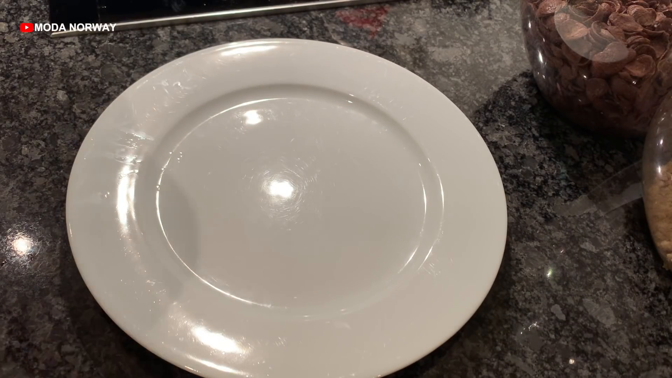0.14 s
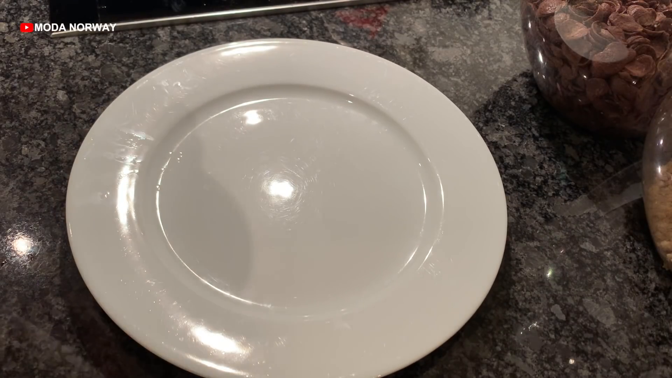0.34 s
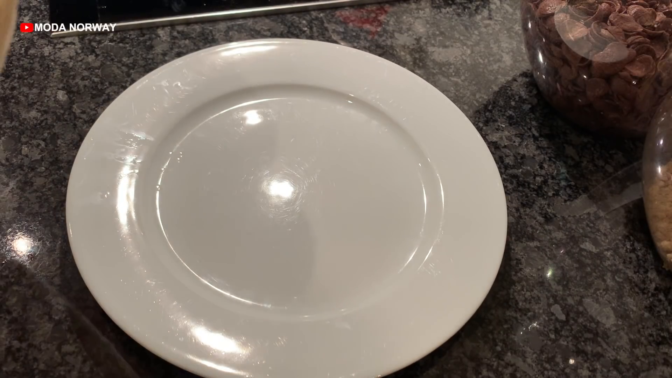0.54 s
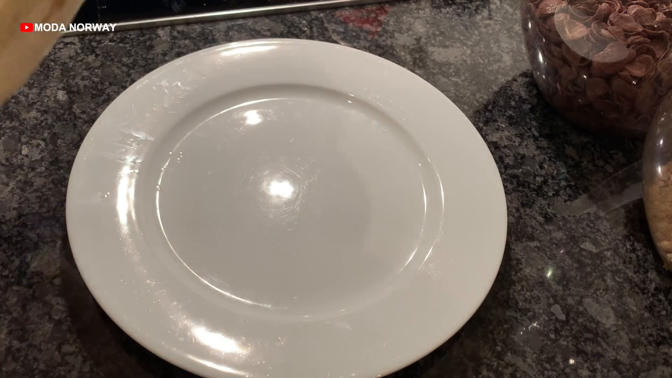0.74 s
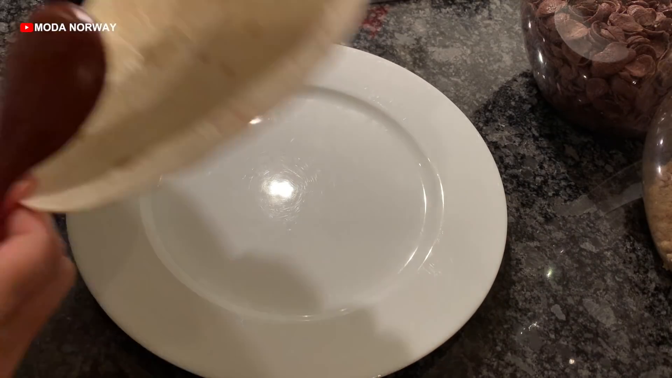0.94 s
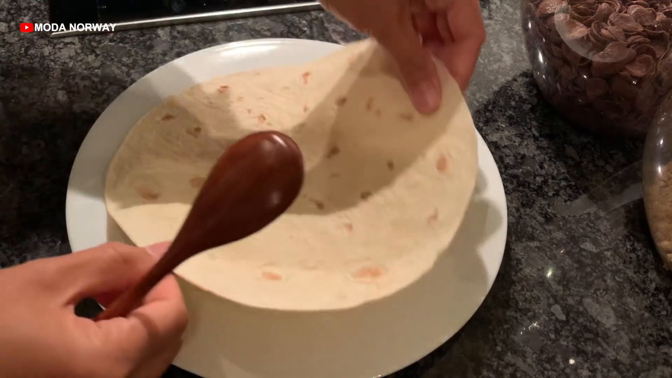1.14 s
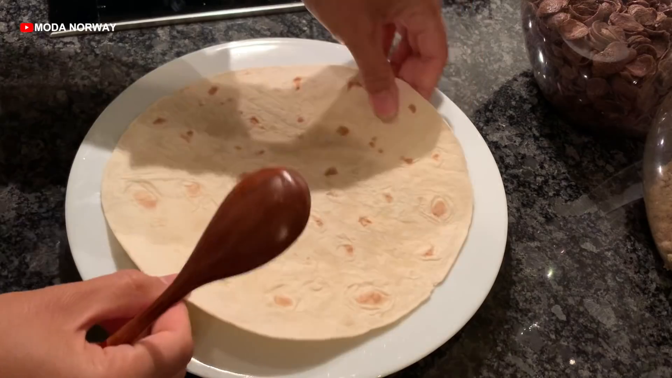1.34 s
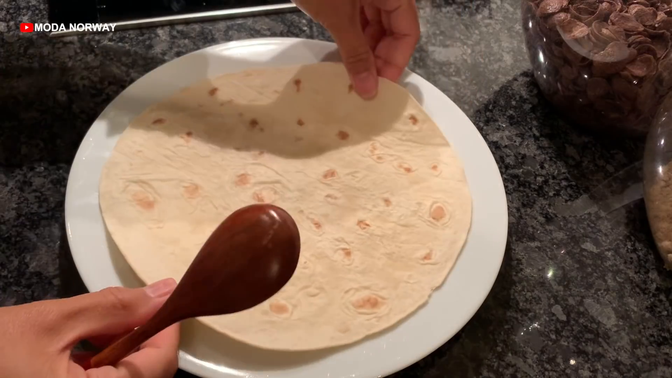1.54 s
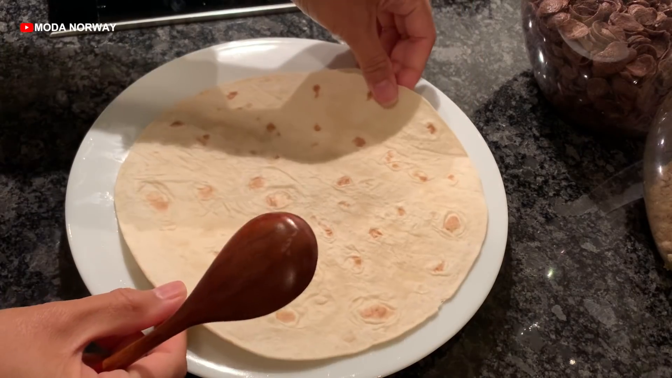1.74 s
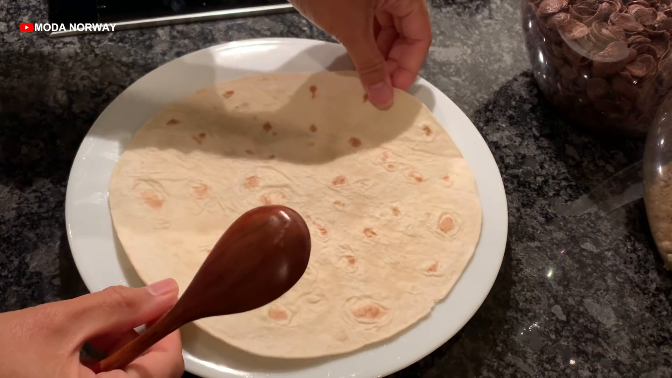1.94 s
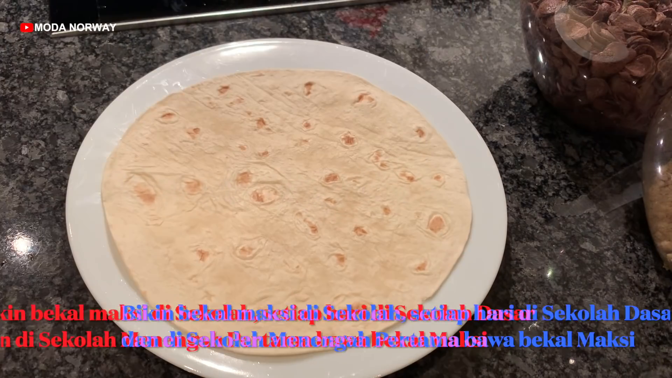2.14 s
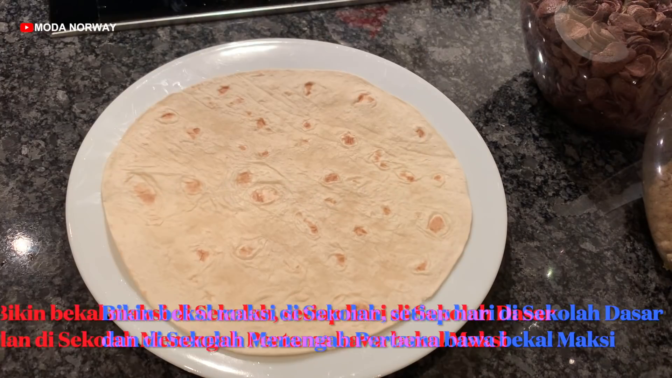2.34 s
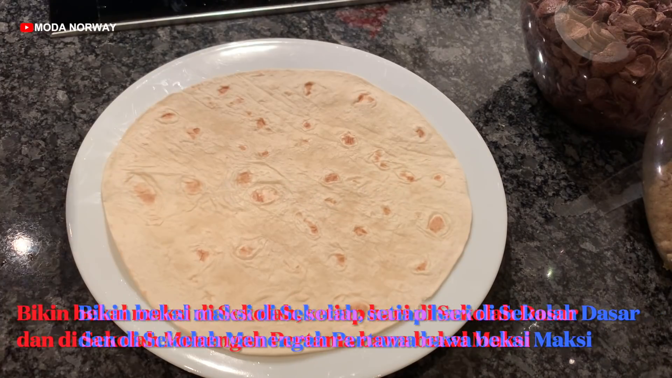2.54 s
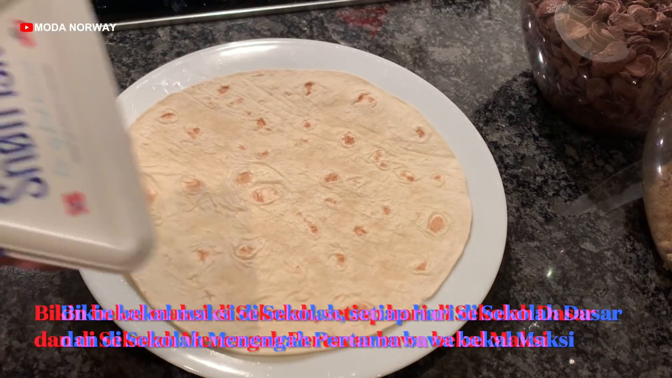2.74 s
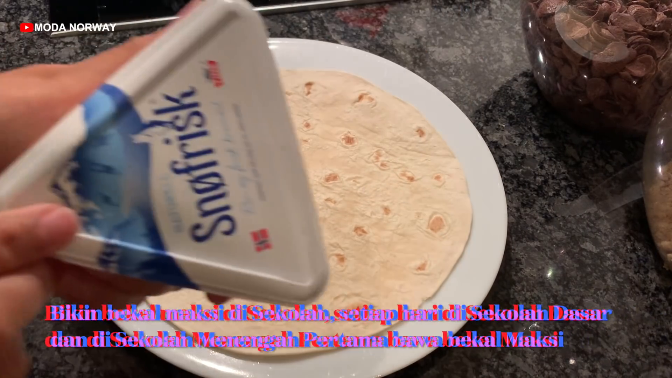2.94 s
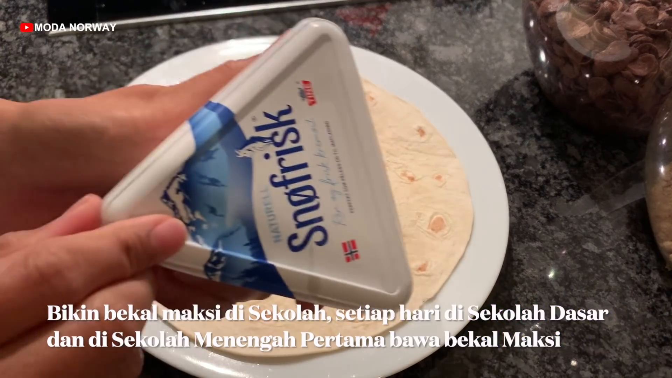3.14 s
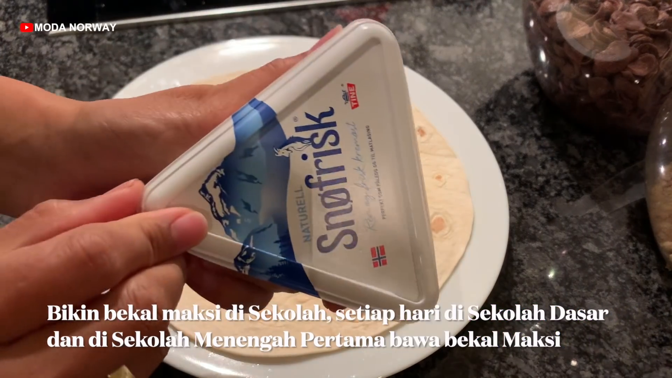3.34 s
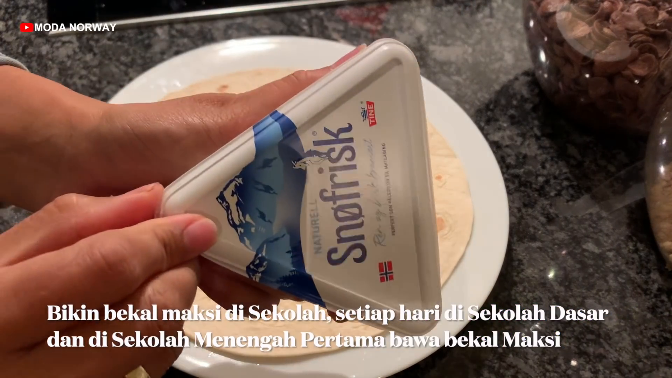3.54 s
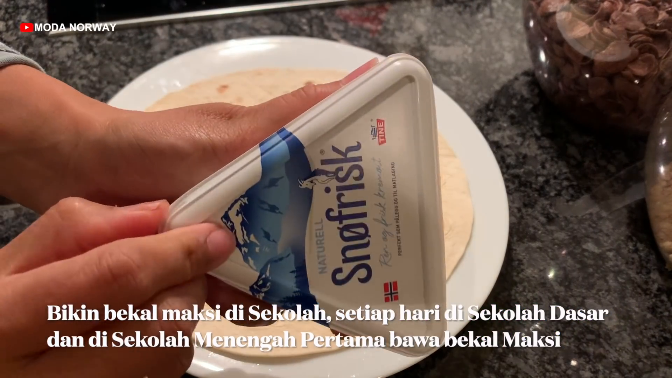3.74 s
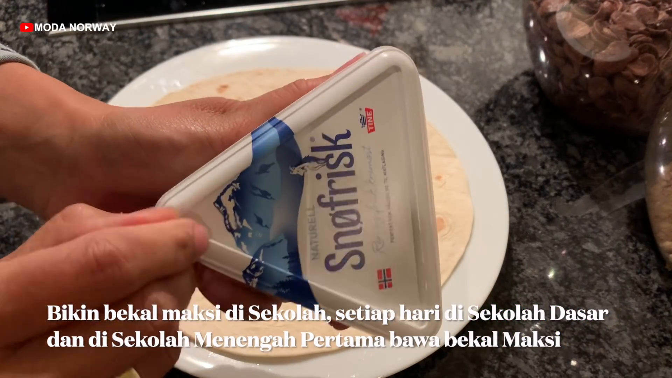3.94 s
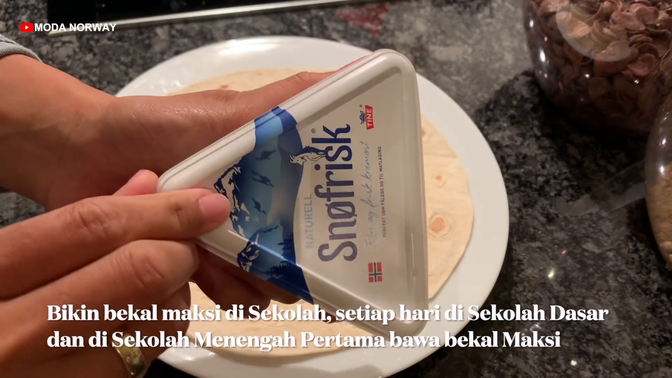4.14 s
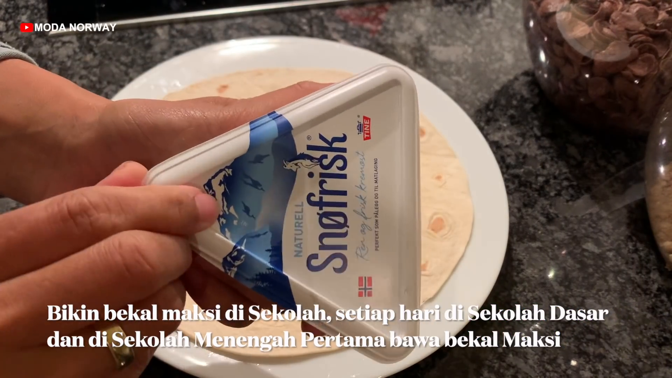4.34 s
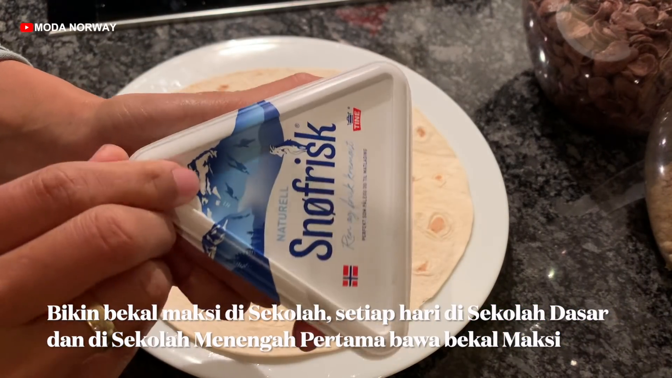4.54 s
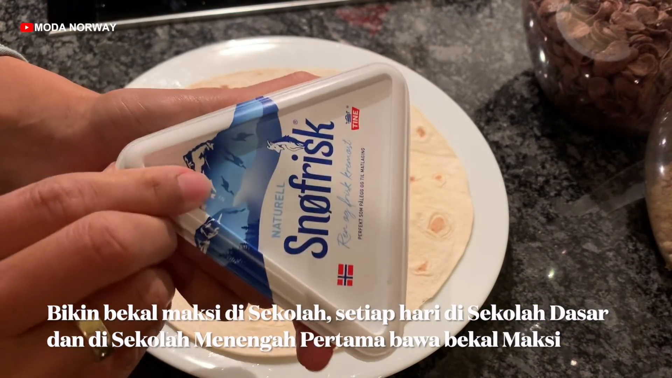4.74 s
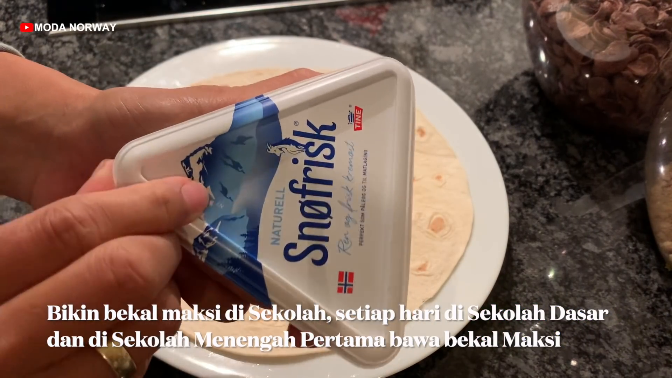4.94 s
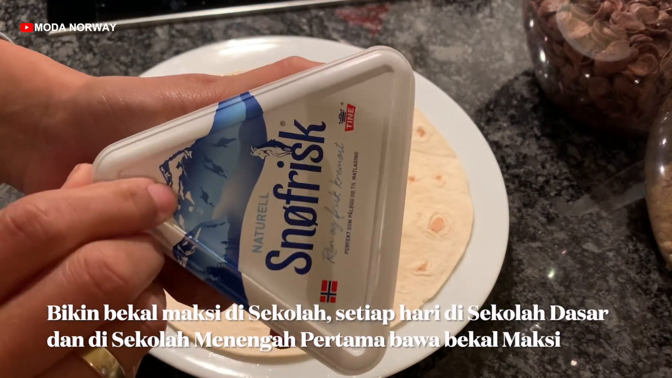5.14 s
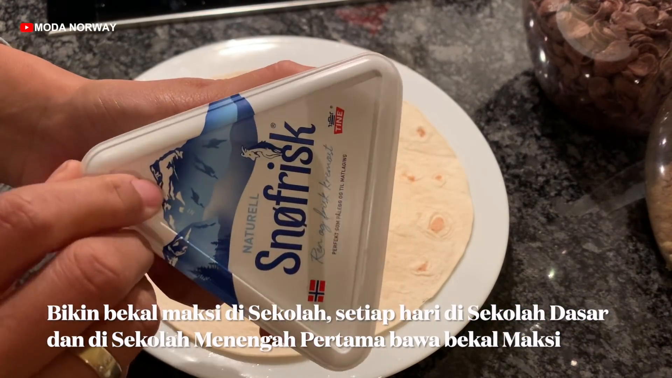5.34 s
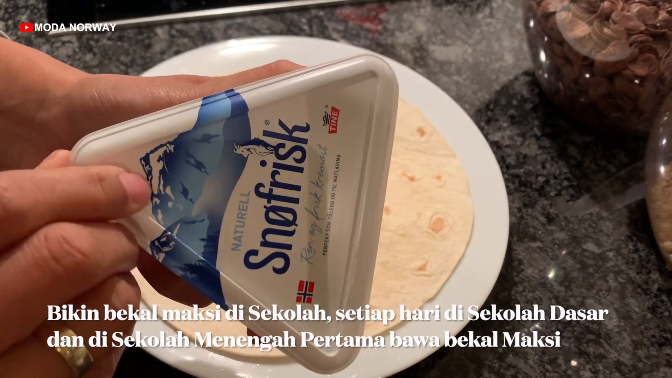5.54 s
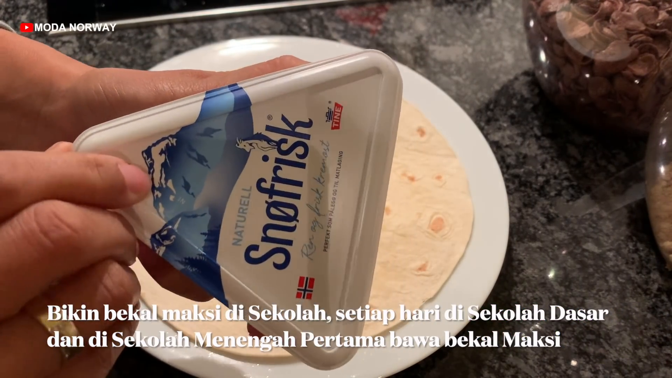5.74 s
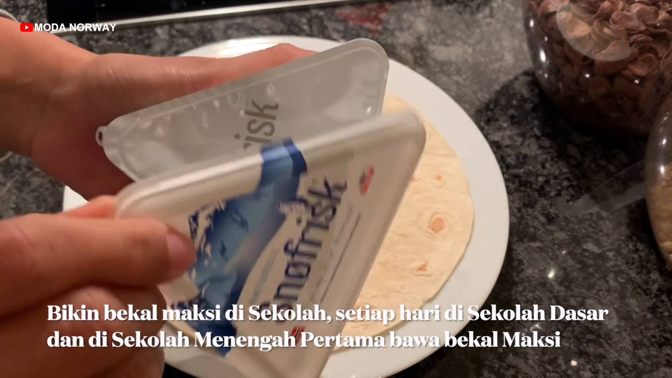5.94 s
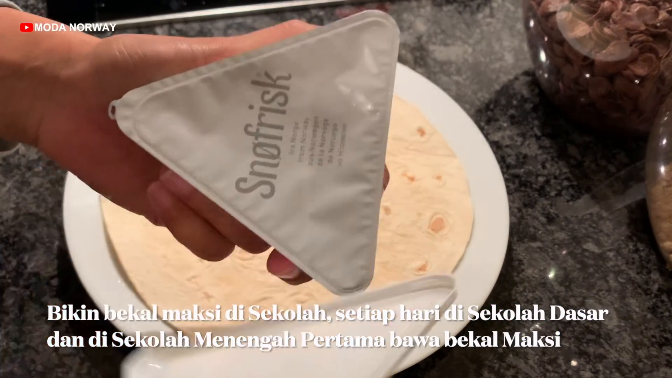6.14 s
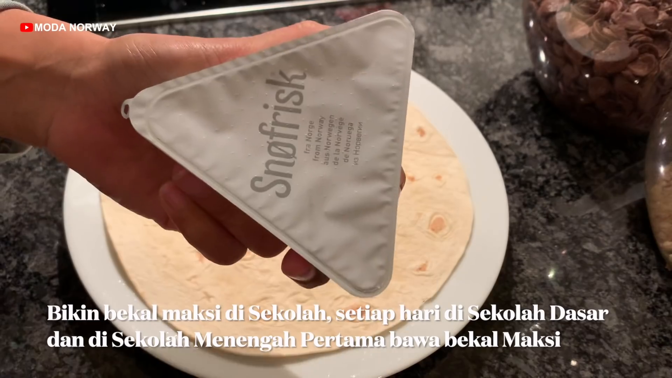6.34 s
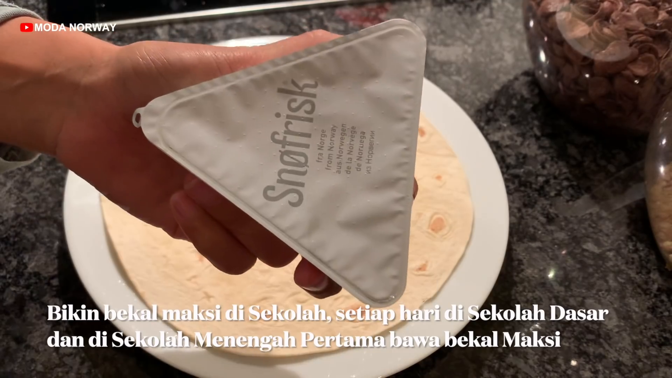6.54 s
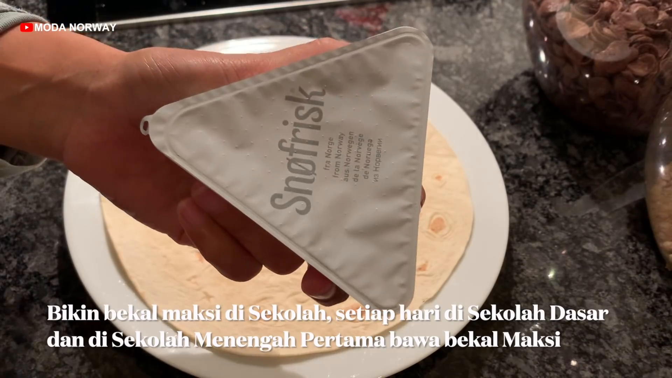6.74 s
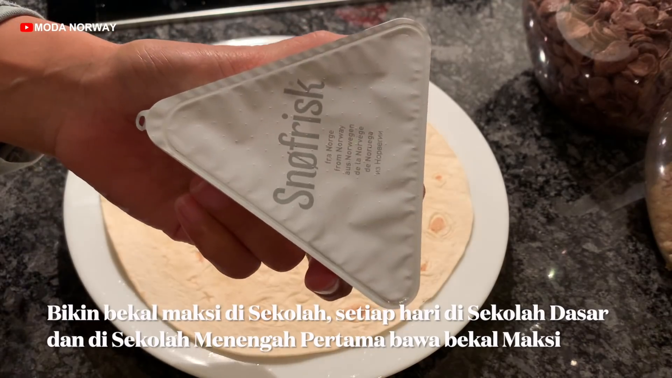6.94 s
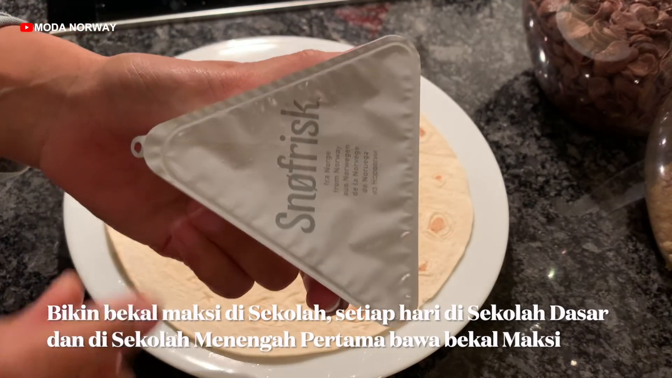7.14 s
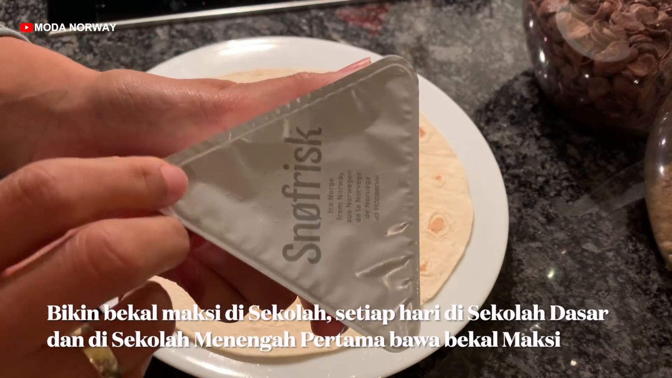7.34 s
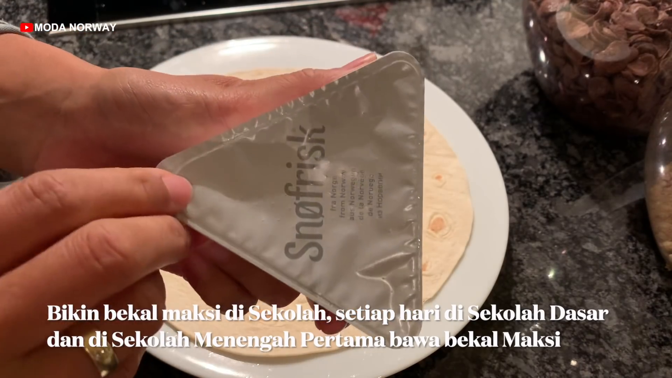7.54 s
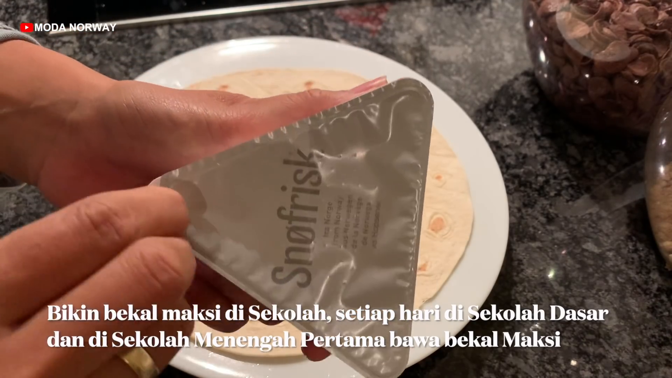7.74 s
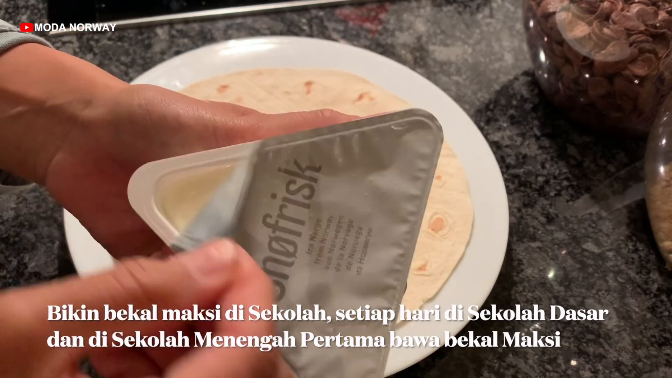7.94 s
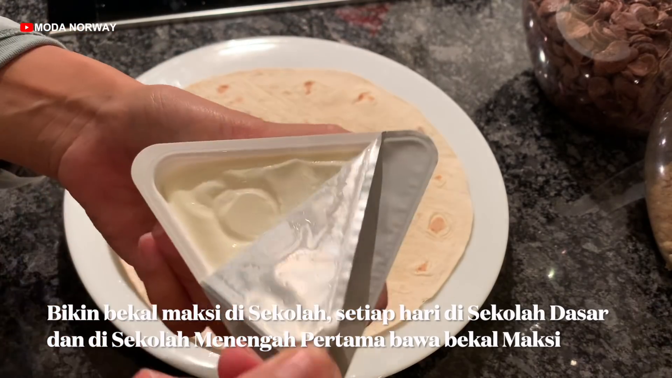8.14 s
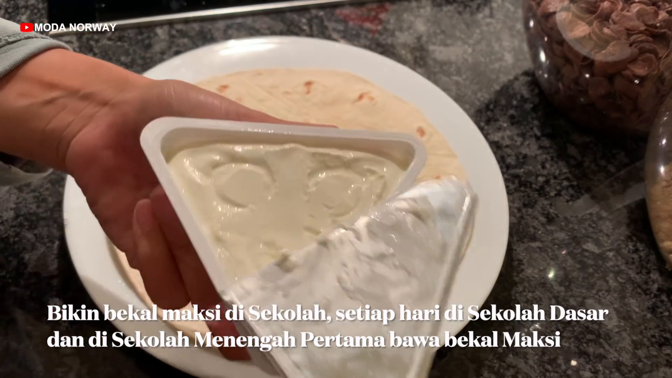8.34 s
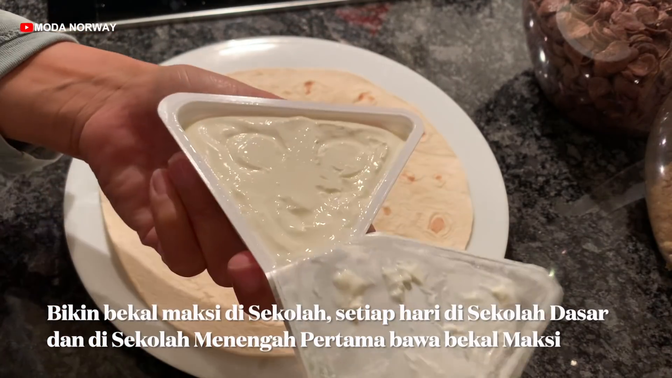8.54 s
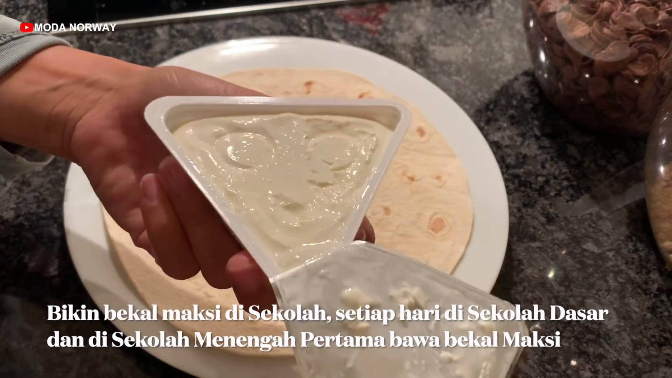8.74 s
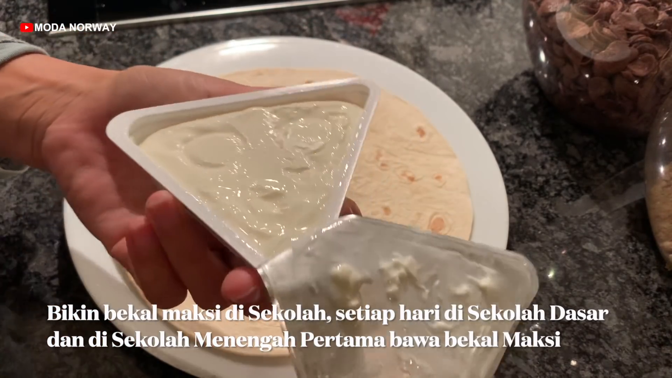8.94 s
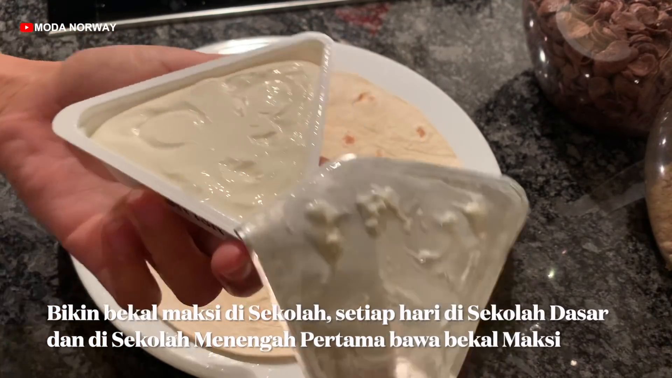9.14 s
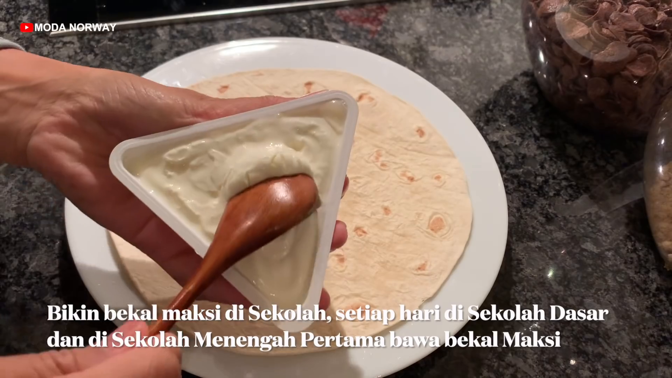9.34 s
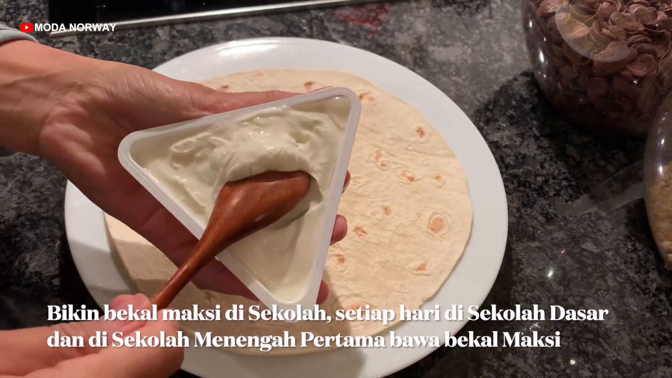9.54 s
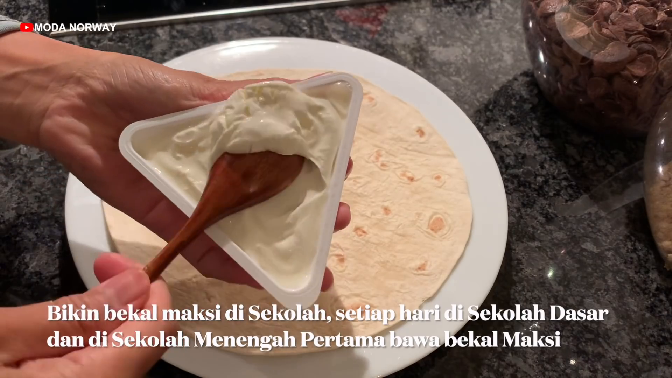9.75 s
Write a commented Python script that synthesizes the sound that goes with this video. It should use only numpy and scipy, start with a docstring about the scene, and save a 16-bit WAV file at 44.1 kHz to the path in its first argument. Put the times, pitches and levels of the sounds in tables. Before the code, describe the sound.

A plastic tub is knocked, flexed and cracked open, its foil seal ripped off in two crackly pulls, before a spoon softly digs in.

```python
"""Snapping plastic close up at a stone kitchen counter, with hollow wooden knocks a little further off; a plate
is lightly tapped. A tub's lid is prised off in runs of cracks; its foil seal crackles away in two pulls and a
spoon digs in soft cheese. Struck parts ring as modes and short noise, coloured by place; friction is filtered
noise made of tiny slips. Hands rub and bump in spells; a small hard room answers with a short tail over a faint
hush."""
import sys
import numpy as np
from scipy import signal
from scipy.fft import rfft, irfft, next_fast_len
from scipy.io import wavfile
from scipy.ndimage import uniform_filter1d

SR = 44100
rng = np.random.default_rng(int(sys.argv[2]) if len(sys.argv) > 2 else 0)


def store_pcm(level_fs):
    """Save levels as 16-bit WAV."""
    pcm = np.round(np.clip(level_fs, -1, 1) * 32767).astype(np.int16)
    wavfile.write(sys.argv[1], SR, np.atleast_2d(pcm).T)


N = 431298
TIME = np.arange(N) / SR
NEAR_SPREAD = .5  # how far near sounds differ between the two microphones


# knocks and scuffs of woodwork: start_s, contact_s, level_db, hardness_db, place
KNOCKS = [(0.324, 0.021, -54.5, 6.5, "frame"), (0.592, 0.12, -33.5, 14, "side"),
          (0.647, 0.012, -12, -9, "panel"), (.765, 0.056, -33.5, -39, "panel"),
          (0.806, 0.02, -43.5, -8, "panel"), (1.024, 0.0045, -32, -30, "panel"),
          (1.064, 0.004, -33, -80, "panel"), (1.118, 0.0055, -37, -30, "side"),
          (1.209, 0.018, -40, -1, "edge"), (1.225, 0.011, -23.5, -22.5, "panel"),
          (1.578, 0.027, -40.5, 7.5, "edge"), (1.604, 0.012, -30, -26, "edge"),
          (1.891, 0.0032, -52, -21.5, "side"), (3.404, 0.026, -23.5, -4, "edge"),
          (3.537, 0.0097, -25.5, -7, "panel"), (3.575, 0.029, -18.5, -8, "panel"),
          (3.645, 0.021, -10, -9.5, "panel"), (3.738, 0.02, -26, 4, "side"),
          (3.779, 0.006, -18, 11, "side"), (4.063, 0.0042, -22.5, -2, "edge"),
          (4.295, 0.015, -36.5, -1.5, "edge"), (4.453, 0.012, -31.5, -6.5, "edge"),
          (4.483, 0.035, -27.5, 11.5, "side"), (4.606, 0.019, -35, 5.5, "frame"),
          (4.638, 0.015, -26.5, 8, "side"), (4.745, 0.017, -20.5, -9.5, "panel"),
          (4.786, 0.03, -17, 9, "edge"), (4.808, 0.0076, -12.5, -22, "edge"),
          (4.997, 0.016, -33, -0.5, "panel"), (5.087, 0.0085, -28.5, -10.5, "panel"),
          (5.183, 0.02, -27, 1, "side"), (5.52, 0.02, -33.5, 6, "side"), (7.34, 0.03, -25.5, 0, "side"),
          (7.678, 0.0069, -37.5, 18, "side")]
# clear modes of the woodwork: mode_hz, level_db, base_t60_s
WOOD_MODES = [(137.6, -11.5, 0.23), (180.4, -10.5, 0.11), (346, -14.5, 0.049), (441, -17, 0.027),
              (598, -16.5, 0.06), (766, -18, 0.15), (820.6, -16, 0.11), (973, -27.5, 0.1),
              (1069, -18.5, 0.039), (1468, -22.5, 0.078), (1596, -22.5, 0.06), (1783, -19, 0.04),
              (2307, -17, 0.071), (2700, -24, 0.06), (2905, -24, .08), (3430, -22.5, 0.11),
              (3890, -33.5, .08)]
# answer of each place, relative to its body register: tone_hz, boom_db, clack_db, fizz_db
PLACES = {"frame": (345.5, 20, -6, -11), "side": (441, 1, -10.5, -25), "panel": (804, -12.5, -2, -6.5),
          "edge": (1099, -2, 1.5, -10)}
CLACK_SHARE, HARDNESS_DB_PER_OCTAVE = .4, 23.5  # share of hardness in the clack; extension of the treble
SUSTAIN, SUSTAIN_WIDTH_OCTAVES = .6, .088  # modes near the favoured tone ring longer


def knocks(dense_t60_s=0.06, dense_hz=1900, dense_db=-13, release_s=0.0042, favour=1.4, sharpness=7.5, top_hz=14000):
    """A rough contact drives clear wood modes over many short ones; hardness lifts fizz and treble limit."""
    t = np.arange(SR // 3) / SR
    out = np.zeros((2, N))
    for start_s, contact_s, level_db, hardness_db, place in KNOCKS:
        tone_hz, boom_db, clack_db, fizz_db = PLACES[place]
        modes = []
        for hz, mode_db, t60_s in WOOD_MODES:
            octaves_off = np.log2(hz / tone_hz)
            longer = 1 + SUSTAIN * np.exp(-(octaves_off / SUSTAIN_WIDTH_OCTAVES) ** 2)
            modes.append((hz, mode_db, t60_s * longer))
        clack_db += CLACK_SHARE * hardness_db
        levels_db = level_db + np.array([boom_db, 0, clack_db, fizz_db + hardness_db])

        push = np.exp(-np.maximum(t - contact_s, 0) / release_s)  # held, then let go
        roughness = rng.standard_normal(len(t)) * amp(2.1 * rng.standard_normal(len(t)))
        force = push * roughness
        dense = signal.lfilter(*signal.butter(1, dense_hz, fs=SR), rattle(force, dense_t60_s, 1.0))
        blow = shaken(force, modes, NEAR_SPREAD) + amp(dense_db) * unit(dense)
        blow = favoured(blow, tone_hz, favour, sharpness)
        blow = signal.sosfilt(signal.butter(6, 128, "high", fs=SR, output="sos"), blow)  # below the modes
        blow = soften(blow, top_hz * 2 ** (hardness_db / HARDNESS_DB_PER_OCTAVE))
        add(out, start_s, voiced(blow, levels_db, contact_s + 0.15))
    return out


# snaps of the plastic: start_s, buckle_s, level_db, tone_hz, part
SNAPS = [(.108, 0.0032, -42, 3000, "lip"), (2.32, 0.0017, -52.5, 2300, "rim"),
         (2.435, 0.0022, -44.5, 2330, "rim"), (2.65, 0.00094, -17, 2430, "lid"),
         (2.6527, 0.0021, -18, 2870, "rim"), (2.85, 0.004, -42, 2500, "rim"),
         (2.979, 0.0011, -60, 2170, "lid"), (3.811, 0.0052, -15.5, 1890, "wall"),
         (3.852, 0.0014, -32.5, 1700, "thin corner"), (4.767, 0.0018, -31, 2400, "wall"),
         (4.958, 0.0017, -37, 1780, "wall"), (5.33, 0.0053, -30, 3100, "lid"),
         (5.34, 0.0027, -26, 2980, "lip"), (5.35, 0.0044, -30, 3000, "rim"),
         (5.371, 0.0017, -22, 3260, "rim"), (5.806, 0.0083, -11.5, 3700, "whole tub"),
         (6.151, .0011, -34.5, 2300, "rim"), (6.182, 0.00098, -41, 2300, "thin corner"),
         (6.4, 0.0061, -18.5, 2480, "lid"), (6.823, 0.007, -6.5, 2070, "lid"),
         (6.8697, .00055, -20, 3270, "lid"), (6.9057, 0.0012, -14.5, 1680, "rim"),
         (7.421, .00085, -37, 3450, "thin corner"), (7.691, 0.0022, -30, 3550, "rim"),
         (7.735, 0.0006, -39.5, 3440, "thin corner"), (7.776, 0.0017, -36.5, 3000, "lid"),
         (8.427, 0.0026, -21.5, 2160, "wall"), (8.514, 0.01, -26, 1960, "lid"),
         (8.633, 0.0009, -20, 3240, "wall"), (8.722, 0.0016, -32, 2210, "filled base"),
         (8.951, 0.0013, -34, 3500, "thin corner"), (9.058, 0.0023, -46, 3770, "lid"),
         (9.13, 0.0055, -32, 1850, "filled base"), (9.175, 0.002, -38, 3900, "lid")]
# modes of the tub: mode_hz, level_db, t60_s
TUB_MODES = [(180, 3, .08), (580, -1, .05), (820, 0, .035), (1400, -3, .03), (1800, 0, .04),
             (2180, 0, .035), (2850, 0, .045), (3450, 1, .035), (6600, 2, .025)]
# answer of each part, relative to its clack register: boom_db, body_db, fizz_db, top_hz
PARTS = {"lid": (-22, -23, -9.5, 12008), "rim": (-21.5, -17, -2.5, 13996.5), "wall": (-16.5, -6, 1, 15012),
         "whole tub": (0.5, -4, -2, 9008), "lip": (-21, -7, 2, 16002), "thin corner": (-27, -4, 7, 16010),
         "filled base": (-9, -1.5, -13, 6006)}
TUB_GAP_HZ = 1214  # weak answer between low and high modes
SETTLE_T60_S, FLUTTER_T60_S = .06, .28


def snaps(crack_db=19, crack_t60_s=0.013, settle_db=-6, flutter_db=-27, favour=1.2):
    """Thin plastic buckles in a run of cracks; the shell rings, settles in creaks and leaves a faint noise tail."""
    t = np.arange(SR // 3) / SR
    out = np.zeros((2, N))
    for start_s, buckle_s, level_db, tone_hz, part in SNAPS:
        boom_db, body_db, fizz_db, top_hz = PARTS[part]
        levels_db = level_db + np.array([boom_db, body_db, 0, fizz_db])

        cracks = (rng.random(len(t)) < 3500 / SR) * (t < buckle_s) * rng.standard_normal(len(t))
        cracks[0] = 1
        cracks /= np.linalg.norm(cracks)
        shell = ring(TUB_MODES, t, 0.8, uneven_db=1, detune=0.025)
        snap = shell + amp(crack_db) * rattle(cracks, crack_t60_s, NEAR_SPREAD)

        jolts = (rng.random(len(t)) < 300 / SR) * rng.standard_normal(len(t))
        creaks = unit(rattle(jolts, .02, 1.0)) * amp(settle_db - 60 * t / SETTLE_T60_S)
        flutter = pair(len(t), 0.67) * amp(flutter_db - 60 * t / FLUTTER_T60_S)
        snap = snap + (creaks + flutter) * np.std(snap[:, :SR // 100])

        snap = favoured(snap, tone_hz, favour, 2.3)
        snap = favoured(snap, TUB_GAP_HZ, -.3, 2)
        add(out, start_s, voiced(soften(snap, top_hz), levels_db, buckle_s + 0.036))
    return out


# tugs that peel the seal, the last only bending it back: start_s, end_s, level_db
TUGS = [(7.87, 7.97, -21), (7.956, 8.033, -13), (8.186, 8.271, -17), (8.308, 8.372, -19),
        (8.456, 8.503, -30.5)]
# sudden slips of the seal: start_s, level_db (before rip_db), tone_hz
RIPS = [(7.8095, -19.5, 7170), (7.837, -14.5, 3000), (7.842, -20.5, 3000), (7.874, -18.5, 4000),
        (7.935, -16, 5630), (7.942, -8.5, 4200), (7.9645, -11.5, 4600), (7.967, -8.5, 1475),
        (7.9745, -23, 6500), (7.98, -14.5, 5300), (7.9865, -11.5, 6400), (7.989, -15, 4300),
        (8.022, -13.5, 7700), (8.033, -24, 3000), (8.048, -15.5, 3140), (8.075, -24.5, 2800),
        (8.218, -15, 5640), (8.228, -10, 4800), (8.258, -22, 6060), (8.261, -14.5, 6600),
        (8.279, -19, 4430), (8.33, -20, 1800), (8.351, -21, 4300), (8.358, -17, 1800), (8.387, -24.5, 1900)]
# spectrum of the tearing foil: freq_hz, level_db_per_hz
FOIL_COLOUR = [(150, -15.5), (600, -46), (1350, -20), (2300, -5.5), (4000, -3), (7000, -0.5), (10000, 0.5),
               (13500, 1.5), (16000, -4)]
TUG_ATTACK_S, TUG_RELEASE_S = 0.021, 0.027


def foil(peel_db=-2, rip_db=1, favour=0.65, sharpness=3):
    """The seal lets go in crackles and sharp slips while creases pop; the freed sheet adds a deeper voice."""
    pull = sum(amp(db) * gesture(start_s, end_s, TUG_ATTACK_S, TUG_RELEASE_S) for start_s, end_s, db in TUGS)
    tear = amp(peel_db) * pull * grains(340, 4.8, .0006, .07)
    t = np.arange(SR // 50) / SR
    slip_shape = t * np.exp(-t / .0008)
    for start_s, level_db, tone_hz in RIPS:
        slip = favoured(pair(len(t), NEAR_SPREAD) * slip_shape, tone_hz, favour, sharpness)
        add(tear, start_s, amp(level_db + rip_db) * unit(slip))

    freed = np.interp(TIME, [8.25, 8.37], [0, 1])
    creases = pull * crinkles(450, 950, 4500, 3) * amp(-16 + 8 * freed)
    sheet_colour = [(120, -2.5), (600, 11.5), (1200, -14), (1800, 10), (2600, 1), (4200, 10.5), (6000, -8.0)]
    sheet = colour(tear * freed, sheet_colour)
    return crumple(colour(tear, FOIL_COLOUR) + sheet, depth_db=4.2) + creases


# light taps on the plate: start_s, level_db (halved in amplitude below)
TAPS = [(1.012, -29.5), (1.211, -40)]
# modes of the plate: mode_hz, level_db, t60_s
PLATE_MODES = [(1400, -3, .17), (2153, -5, 0.22), (2955, -4, 0.12), (3740, -2, 0.06), (4657, -4, 0.09),
               (5590, -4, 0.16), (6600, -4, .13), (7741, -6, .16), (8958, -6, 0.14)]


def plate(tick_db=4, tick_t60_s=0.022):
    """China answers a light touch with a noise tick and a short modal ring."""
    t = np.arange(SR // 3) / SR
    out = np.zeros((2, N))
    for start_s, level_db in TAPS:
        tick = amp(tick_db - 60 * t / tick_t60_s) * pair(len(t), 0.98)
        china = ring(PLATE_MODES, t, NEAR_SPREAD, uneven_db=2, detune=0)
        add(out, start_s, amp(level_db) * (china + tick) / 2)
    return out


# sliding strokes of hand, lid and spoon: peak_s, swell_s, level_db, surface
STROKES = [(.07, .035, -57.5, "tortilla"), (1.47, 0.16, -42, "tortilla"), (1.951, 0.025, -34, "skin"),
           (2.39, 0.1, -55.5, "tub wall"), (2.449, 0.077, -45.5, "tortilla"), (3.168, 0.12, -59, "soft"),
           (6.061, 0.037, -27.5, "plastic"), (6.13, 0.0086, -37.5, "plastic"),
           (6.752, 0.02, -43, "plastic"), (7.123, 0.041, -39.5, "foil"), (7.533, 0.022, -37, "tub wall"),
           (8.865, 0.0063, -31.5, "foil"), (9.475, 0.055, -42, "plastic"), (9.528, 0.0048, -39, "plastic")]
# friction on each surface: centre_hz, hiss_db
SURFACES = {"tortilla": (3370, 0), "tub wall": (2330, -29), "foil": (2020, -20.5), "skin": (2870, -38),
            "plastic": (2580, -50), "soft": (720, -45)}


def strokes(fade_s=0.042):
    """Friction grains in a broad band swell and die away; each surface has its own pitch, the soft one lowest."""
    friction = grains(740, 9.3, 0.0078, 1.0)
    out = np.zeros((2, N))
    hiss = unit(colour(friction, [(5000, -29.5), (9000, -34.5), (13500, 17.0), (16000, 10.5)]))
    band_colour = [(150, -1.5), (500, 12.0), (5000, -18.0), (10000, -10.5), (16000, -27.5)]
    for peak_s, swell_s, level_db, surface in STROKES:
        centre_hz, hiss_db = SURFACES[surface]
        first = round((peak_s - 2 * swell_s) * SR)
        t = TIME[first:][:SR * 3 // 4] - peak_s
        span = slice(first, first + len(t))
        edges_hz = [centre_hz / 0.69, min(centre_hz * 2.43, SR * .45)]
        band = signal.lfilter(*signal.butter(1, edges_hz, "band", fs=SR), friction[:, span])
        band = colour(favoured(band, centre_hz, 1.5, 2.5), band_colour)
        rub = unit(band) + amp(hiss_db) * hiss[:, span]
        shape = np.where(t < 0, np.exp(-(t / swell_s) ** 2 * 2), np.exp(-abs(t) / fade_s))
        add(out, first / SR, amp(level_db) * unit(rub) * shape)
    return crumple(out, depth_db=5.5)


# scoops of the spoon: start_s, end_s, level_db, start_tone_hz, end_tone_hz
SCOOPS = [(9.22, 9.245, -39, 1190, 1200), (9.27, 9.31, -43.5, 597, 1250), (9.34, 9.36, -42, 1170, 1514),
          (9.405, 9.485, -36.5, 594, 1380), (9.645, 9.665, -41, 1170, 1360)]
# spectrum of the tub of cheese: freq_hz, level_db_per_hz
HOLLOW = [(150, 2), (460, -9.5), (630, -6), (850, -10), (1380, -7.5), (1750, -9), (2190, -2.5), (2800, -6),
          (3900, -4.5), (8000, -31), (16000, -57)]
SCOOP_ATTACK_S, SCOOP_RELEASE_S = .01, .025


def scoops(smear_db=-5, pops_db=-5, width_hz=320):
    """A spoon drags through sticky cheese: tone rising as the bowl fills, and wet pops, coloured by the tub."""
    drag = grains(300, 5, .002, .4)
    pops = crinkles(300, 400, 2600, 4)
    tone_s = np.ravel([row[:2] for row in SCOOPS])
    tone_hz = np.interp(TIME, tone_s, np.ravel([row[3:] for row in SCOOPS]))
    # moving resonance: shift the tone to 0 Hz, low-pass, shift back
    turn = np.exp(2j * np.pi * np.cumsum(tone_hz) / SR)
    r = np.exp(-np.pi * width_hz / SR)
    squelch = unit((turn * signal.lfilter([1 - r], [1, -r], drag / turn)).real)
    push = sum(amp(db) * gesture(start_s, end_s, SCOOP_ATTACK_S, SCOOP_RELEASE_S)
               for start_s, end_s, db, _, _ in SCOOPS)
    wet = unit(colour(squelch + amp(pops_db) * pops, HOLLOW))
    smear = unit(colour(drag, HOLLOW))
    return push * unit(wet + amp(smear_db) * smear)


# spells of rubbing by fingers, tortilla and spoon: start_s, end_s, level_db, dryness_db
RUBS = [(0.903, 1.435, -43.5, -9), (3.603, 4.06, -40.5, -3.5), (4.353, 5.32, -40, -4.5),
        (5.34, 5.71, -42, -24), (5.875, 6.456, -39, -3), (6.438, 7.215, -48.5, -2),
        (7.328, 8.13, -41, -1.5), (8.24, 8.527, -34, 1), (8.71, 9.006, -53, -8), (9.195, 9.76, -53.5, 1.5)]
RUB_ATTACK_S, RUB_RELEASE_S = 0.092, 0.15
RESTING_DB, RESTING_DRYNESS_DB = -64.5, -15  # hands nearly still


def hands():
    """Strengths of dull rub and dry swish: spells add in power above a resting level."""
    dull = amp(RESTING_DB) ** 2
    dry = amp(RESTING_DB + RESTING_DRYNESS_DB) ** 2
    for start_s, end_s, level_db, dryness_db in RUBS:
        power = (amp(level_db) * gesture(start_s, end_s, RUB_ATTACK_S, RUB_RELEASE_S)) ** 2
        dull = dull + power
        dry = dry + power * amp(dryness_db) ** 2
    return np.sqrt(dull), np.sqrt(dry)


# spectra of the dull rub and the dry swish: freq_hz, level_db_per_hz
RUB_COLOUR = [(60, -25), (135, 5.5), (200, 0.5), (280, -1), (550, -4.5), (1100, -10), (1800, -18),
              (4000, -35.5)]
SWISH_COLOUR = [(600, -38), (1300, 14.5), (2100, 14.5), (4000, 8.5), (7000, 3.5), (10000, 2), (14000, -21),
                (16000, -10.5)]


def rubbing(pressure, dry_pressure, rub_db=-1, swish_db=-2):
    """Skin slides over plate and tub in small slips: a dull rub and a dry swish."""
    dull = unit(colour(grains(30, 4.5, 0.022, 0.4), RUB_COLOUR)) * pressure
    dry = unit(colour(grains(220, 2.4, 0.024, 0.95), SWISH_COLOUR)) * dry_pressure
    return amp(rub_db) * dull + amp(swish_db) * crumple(dry, depth_db=3)


# soft bumps and stirred air from the hands: peak_s, half_length_s, level_db
BUMPS = [(0.676, 0.11, -40.5), (1.382, 0.036, -40), (3.201, 0.045, -39.5), (5.757, 0.26, -42),
         (6.287, 0.044, -34), (7.417, 0.066, -25.5), (7.72, 0.037, -23.5), (8.29, 0.031, -21.5),
         (8.72, 0.035, -39), (8.966, 0.11, -41)]
# spectrum of the bumps: freq_hz, level_db_per_hz
BUMP_COLOUR = [(15, -13), (28, -14), (42, -2.5), (60, -3), (90, -9.5), (140, -19.5), (400, -35),
               (1500, -74), (6000, -95.5)]


def bumps(pressure, rumble_db=-8, still_db=-68):
    """Deep soft thuds of moving hands over a rumble that follows their rubbing, nearly alike in both channels."""
    low = colour(pair(N, 0.67), BUMP_COLOUR)
    steady = low / np.sqrt(uniform_filter1d((low ** 2).mean(0), SR // 15) + 1e-12)
    swells = sum(amp(db) * np.exp(-((TIME - peak_s) / half_s) ** 2) for peak_s, half_s, db in BUMPS)
    rumble = unit(colour(low, [(30, -11.0), (70, 8.0)]))
    return steady * swells + rumble * (amp(rumble_db) * pressure + amp(still_db))


# lead of the left microphone over the right: freq_hz, lead_rad
PORT_LEAD = [(0, 0), (160, 0), (280, .9), (1500, .9), (2800, 2.2), (7600, 11), (10600, 5.7), (13200, .3),
             (16000, -4.0), (22000, -4)]


def ports(x):
    """Two microphone openings hear near things out of step: a phase lead per frequency."""
    size = next_fast_len(N + SR // 10)
    lead_rad = np.interp(np.fft.rfftfreq(size, 1 / SR), *np.transpose(PORT_LEAD))
    turn = np.exp(1j * lead_rad * np.array([[.5], [-.5]]))
    return irfft(rfft(x, size) * turn, size)[:, :N]


# decay of the room: freq_hz, t60_s
ROOM_DECAY = [(150, 0.79), (400, 0.34), (1000, 0.29), (2800, 0.33), (7000, 0.26), (14000, 0.095)]


def room(x, onset_s=0.0021):
    """Tiles and stone return a dense noise tail whose decay time depends on frequency, the top dying first."""
    hz, t, z = signal.stft(pair(SR * 3 // 4, 0.97), SR, nperseg=256)
    decay = amp(-60 * t / read(ROOM_DECAY, hz)[:, None])
    tail = signal.istft(z * decay, SR, nperseg=256)[1]
    tail = tail * (1 - np.exp(-np.arange(tail.shape[1]) / SR / onset_s))
    tail_colour = [(100, -10.5), (500, 6.0), (2300, 4.5), (6000, 4.5), (14000, 7.5)]
    tail = colour(tail / np.linalg.norm(tail[0]), tail_colour)
    return signal.fftconvolve(x, tail, axes=1)[:, :N]


# spectrum of the quiet kitchen: freq_hz, level_db_per_hz
HUSH_COLOUR = [(20, -17), (45, -2), (80, 5), (160, 5.5), (300, -8), (1000, -19.5), (2500, -15),
               (6000, -22.5), (14000, -24.5), (16000, -36)]


def kitchen_hush(level_db):
    """Steady coloured noise, largely unrelated between the channels above the bass."""
    return amp(level_db) * unit(colour(pair(N, 0.91), HUSH_COLOUR))


def amp(db):
    """Decibels to amplitude."""
    return 10 ** (np.asarray(db) / 20)


def unit(x):
    """Scales to rms 1."""
    return x / np.sqrt(np.mean(x ** 2) + 1e-20)


def read(points, hz):
    """Reads a table on a log-frequency axis."""
    f, value = np.transpose(points)
    return np.interp(np.log(hz + 1), np.log(f + 1), value)


def add(mix, start_s, sound):
    """Mixes a stereo sound in at start_s."""
    part = mix[:, max(round(start_s * SR), 0):][:, :sound.shape[1]]
    part += sound[:, :part.shape[1]]


def gesture(start_s, end_s, attack_s, release_s):
    """Gain that rises from the start, holds until the end, then dies away."""
    rise = np.clip((TIME - start_s) / attack_s, 0, 1)
    return rise * np.exp(-np.maximum(TIME - end_s, 0) / release_s)


def colour(x, points, size=4096):
    """Causal minimum-phase filter with the given spectrum, so clicks stay sharp."""
    log_gain = np.log(amp(read(points, abs(np.fft.fftfreq(size, 1 / SR)))))
    taps = np.fft.ifft(np.exp(np.conj(signal.hilbert(log_gain)))).real
    return signal.oaconvolve(x, taps[None, :size // 2], axes=1)[:, :x.shape[1]]


def soften(x, top_hz):
    """Rolls off the treble above top_hz."""
    return signal.lfilter(*signal.butter(2, min(top_hz, SR * .45), fs=SR), x)


def favoured(x, hz, gain, sharpness):
    """Lifts a band around one tone; a negative gain dips it."""
    return x + gain * signal.lfilter(*signal.iirpeak(hz, sharpness, fs=SR), x)


# edges of the boom, body, clack and fizz registers: edge_hz
BAND_EDGES_HZ = [100, 280, 1300, 5000, 16000]


def voiced(x, levels_db, span_s):
    """Sets each register's strength: energy of the first span_s seconds, as rms over 20 ms."""
    out = 0
    for lo_hz, hi_hz, db in zip(BAND_EDGES_HZ, BAND_EDGES_HZ[1:], levels_db):
        band = signal.sosfilt(signal.butter(3, [lo_hz, hi_hz], "band", fs=SR, output="sos"), x)
        power = np.mean(band[:, :round(span_s * SR)] ** 2) * span_s / .02
        out = out + band * amp(db) / np.sqrt(power + 1e-20)
    return out


def pair(count, apart):
    """Noise at two microphones: alike in the bass, partly unrelated above."""
    mid, side = rng.standard_normal((2, count))
    side = apart * signal.lfilter(*signal.butter(3, 230, "high", fs=SR), side)
    return np.array([mid + side, mid - side]) / np.sqrt(1 + apart ** 2)


def stereo_phase(hz, spread, angle):
    """Opposite phase offsets for the two channels, smaller below 700 Hz."""
    return spread * min(hz / 700, 1) * angle * np.array([[1], [-1]])


def ring(modes, t, spread, uneven_db, detune):
    """Dying modes, stirred unevenly by where the blow lands, detuned by how the thing is held."""
    out = np.zeros((2, len(t)))
    for (hz, db, t60_s), (place, grip, angle) in zip(modes, rng.standard_normal((len(modes), 3))):
        phase = stereo_phase(hz, spread, angle)
        decay = amp(db + uneven_db * place - 60 * t / t60_s)
        out += decay * np.sin(2 * np.pi * hz * (1 + detune * grip) * t + phase)
    return out


def shaken(force, modes, spread):
    """Modes driven by a force, each scaled to its own share of the energy."""
    out = 0
    for (hz, db, t60_s), angle in zip(modes, rng.standard_normal(len(modes))):
        pole = amp(-60 / (t60_s * SR)) * np.exp(2j * np.pi * hz / SR)
        mode = signal.lfilter([1], [1, -pole], force)
        out = out + amp(db) * unit((mode * np.exp(1j * stereo_phase(hz, spread, angle))).real)
    return out


def rattle(force, t60_s, spread):
    """Countless short modes, as noise that follows the force's power and dies away."""
    power = signal.lfilter([1], [1, -amp(-60 / (t60_s * SR)) ** 2], force ** 2)
    return np.sqrt(power) * pair(len(force), spread)


def grains(per_s, spread_db, decay_s, wash):
    """Tiny slips of uneven size, each a short puff of noise, over a steady wash."""
    sizes = (rng.random(N) < per_s / SR) * amp(spread_db * np.minimum(rng.exponential(1, N), 3))
    power = signal.lfilter([1], [1, -np.exp(-2 / (decay_s * SR))], sizes ** 2)
    power /= uniform_filter1d(power, SR // 12) + 1e-9
    return np.sqrt(abs(power) + wash ** 2) * pair(N, NEAR_SPREAD)


def crinkles(per_s, lo_hz, hi_hz, cycles, count=24):
    """Sparse tiny pops of uneven size, each ringing a few cycles at one of count pitches."""
    t = np.arange(SR // 40) / SR
    out = np.zeros((2, N))
    for hz in np.geomspace(lo_hz, hi_hz, count):
        phase = NEAR_SPREAD * rng.standard_normal((2, 1))
        pop = np.exp(-t * hz / cycles) * np.sin(2 * np.pi * hz * t + phase)
        for at, size in rng.random((round(per_s * N / SR / count), 2)):
            add(out, at * N / SR, amp(14 * size) * pop)
    return unit(out)


def crumple(x, depth_db):
    """A flexing sheet shifts its resonances: gain patches about 900 Hz wide that last some 20 ms."""
    z = signal.stft(x, SR, nperseg=256)[2]
    patches = uniform_filter1d(rng.standard_normal(z.shape[1:]), size=5, axis=0)
    patches = uniform_filter1d(patches, size=7, axis=1)
    return signal.istft(z * unit(amp(depth_db * unit(patches))), SR, nperseg=256)[1][:, :N]


def scene(knock_wet_db=-10.5, snap_wet_db=-14, foil_wet_db=-14, stroke_wet_db=-8, hush_db=-59):
    """Near plastic and foil, woodwork with more room, all in one quiet kitchen."""
    wood = knocks()
    clicks = snaps() + plate()
    seal = foil()
    slides = strokes() + scoops()
    sent = amp(knock_wet_db) * wood + amp(snap_wet_db) * clicks
    sent = sent + amp(foil_wet_db) * seal + amp(stroke_wet_db) * slides
    pressure, dry_pressure = hands()
    near = wood + clicks + seal + slides + rubbing(pressure, dry_pressure) + bumps(pressure)
    return ports(near) + room(sent) + kitchen_hush(hush_db)


def record(dry):
    """Rounds off the loudest peaks at full scale, then limits the band to 16.2 kHz."""
    held = dry / (1 + dry ** 6) ** (1 / 6)
    low_pass = signal.firwin(511, 16200, window=("kaiser", 9), fs=SR)
    return signal.oaconvolve(held, low_pass[None], "same", axes=1)


dry = scene()
out = record(dry)
store_pcm(out)
```